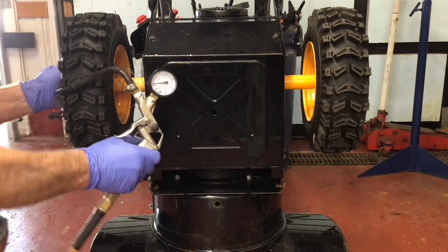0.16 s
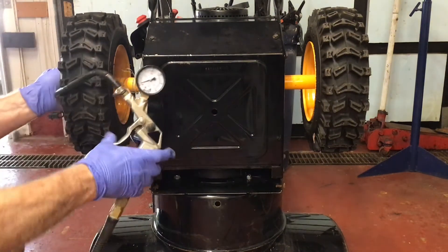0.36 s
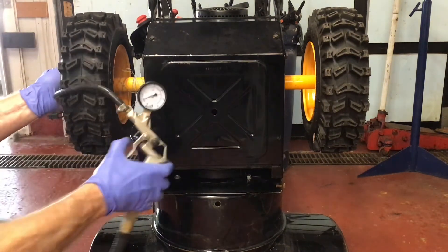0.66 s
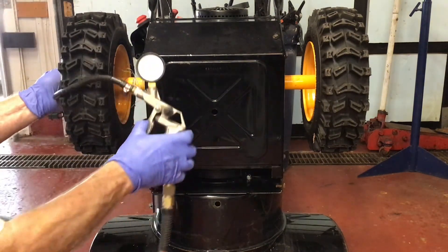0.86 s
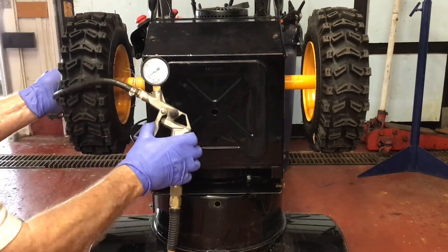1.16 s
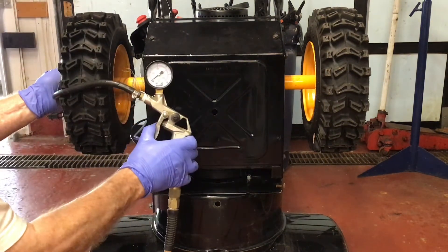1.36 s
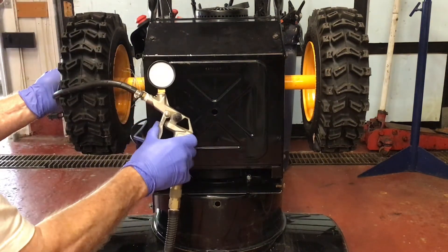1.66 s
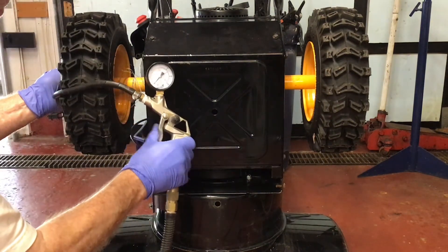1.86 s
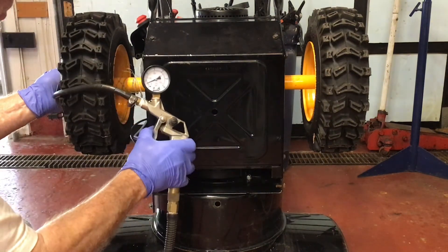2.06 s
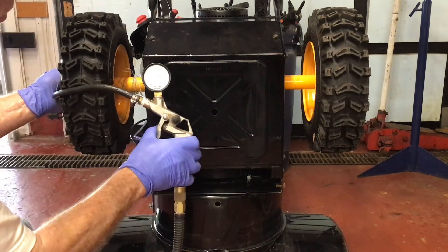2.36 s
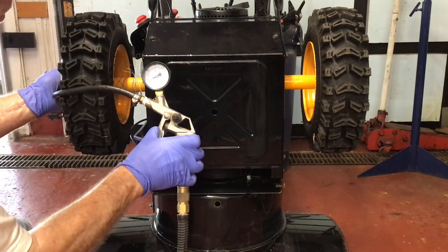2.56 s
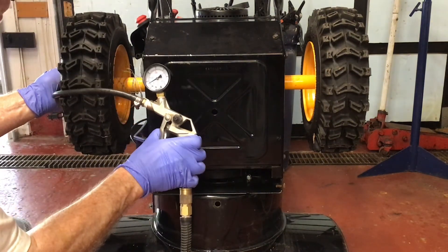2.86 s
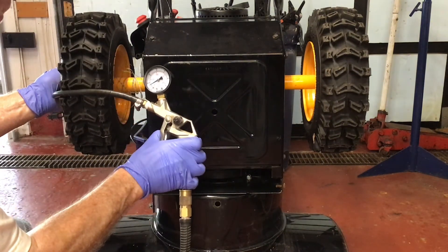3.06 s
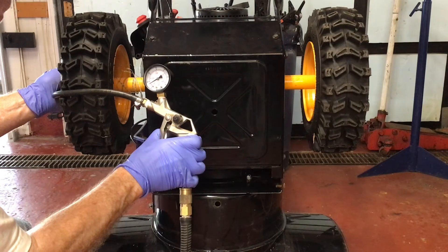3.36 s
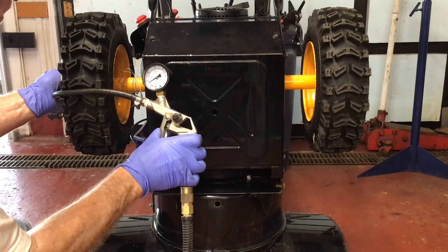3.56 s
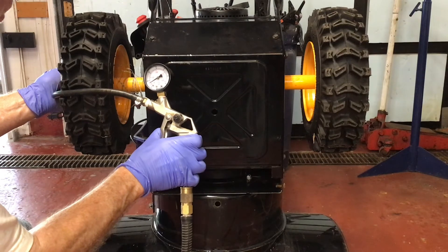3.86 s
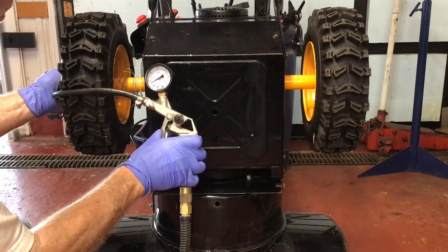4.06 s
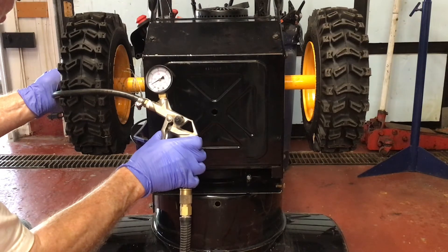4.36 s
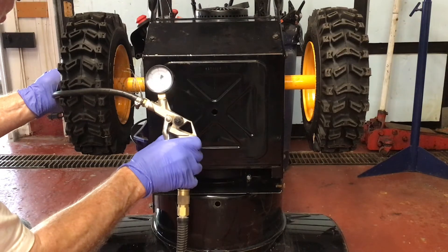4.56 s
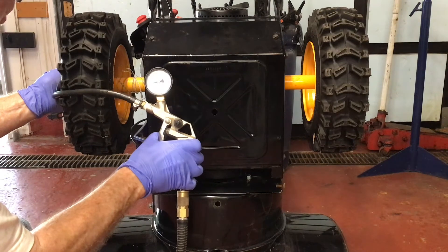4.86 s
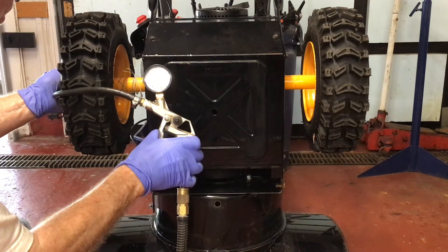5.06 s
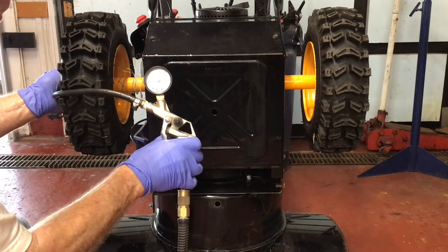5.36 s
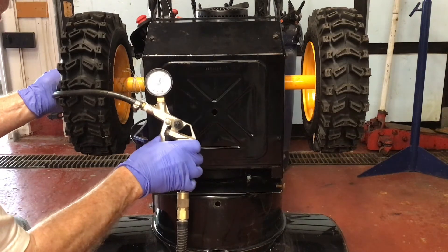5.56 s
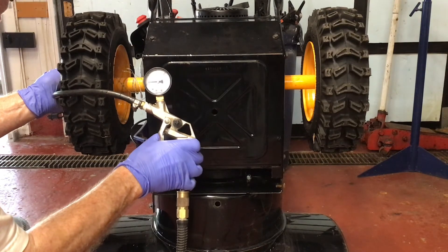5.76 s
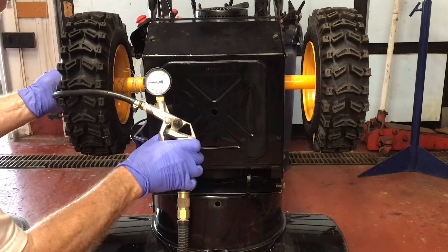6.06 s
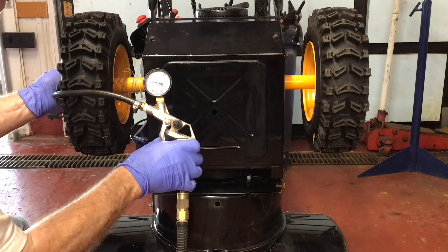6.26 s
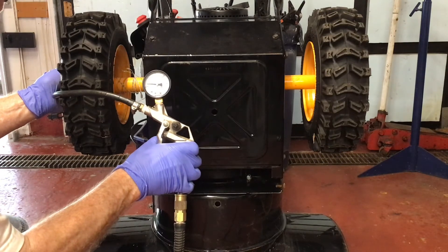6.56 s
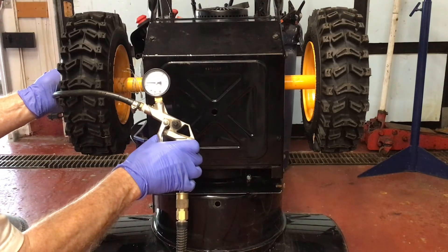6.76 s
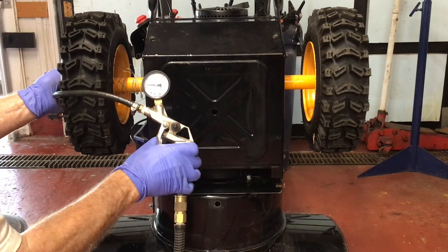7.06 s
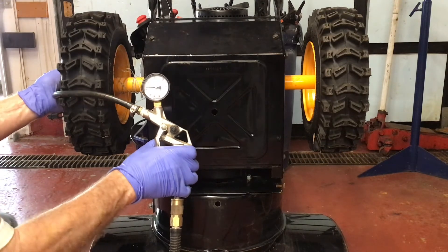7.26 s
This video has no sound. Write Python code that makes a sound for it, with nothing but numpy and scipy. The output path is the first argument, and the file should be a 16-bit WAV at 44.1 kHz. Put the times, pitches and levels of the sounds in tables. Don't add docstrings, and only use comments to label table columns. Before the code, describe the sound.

In an open garage, a hand-held tire inflator is handled with quick metallic clicks, soft hose knocks and faint rubbing. Then come short bursts of compressed air, each started by a trigger click: a soft one, two strong bright hisses, a weaker puff. Cicadas buzz outside over a low traffic rumble. It ends on a glove or hose rub. One microphone, same on both sides, fairly close, with modest room echo.

```python
import sys
import numpy as np
from scipy import signal
from scipy.fft import rfft, irfft
from scipy.io import wavfile
from scipy.ndimage import uniform_filter1d

SR = 44100
rng = np.random.default_rng(int(sys.argv[2]) if len(sys.argv) > 2 else 0)


def store_pcm(level_fs):
    pcm = np.round(np.clip(level_fs, -1, 1) * 32767).astype(np.int16)
    wavfile.write(sys.argv[1], SR, np.atleast_2d(pcm).T)


def ratio_of_db(decibels):
    return 10 ** (np.asarray(decibels, float) / 20)


N = 326340
TIME = np.arange(N) / SR


def rms_one(x):
    return x / np.sqrt(np.mean(x ** 2) + 1e-20)


def curve(rows):
    s, *columns = np.transpose(rows)
    return [np.interp(TIME, s, c) for c in columns]


def at_hz(points, hz):
    point_hz, value = np.transpose(points)
    return np.interp(np.log(hz), np.log(point_hz), value)


def colour(x, points):
    hz = np.maximum(np.fft.rfftfreq(N, 1 / SR), 1)
    return rms_one(irfft(rfft(x) * ratio_of_db(at_hz(points, hz)), N))


def high_pass(x, order, hz):
    return signal.sosfiltfilt(signal.butter(order, hz, "high", fs=SR, output="sos"), x)


def band_pass(x, order, low_hz, high_hz):
    return signal.sosfilt(signal.butter(order, [low_hz, high_hz], "band", fs=SR, output="sos"), x)


def drift(rate_hz, at=np.arange(N)):
    step = max(1, int(SR / rate_hz / 16))
    sos = signal.butter(2, rate_hz, fs=SR / step, output="sos")
    slow = signal.sosfilt(sos, rng.standard_normal(N // step + 202))[200:]
    return np.interp(at / step, np.arange(len(slow)), rms_one(slow))


def ring(clicks, hz, t60):
    r, w = ratio_of_db(-60 / (t60 * SR)), 2 * np.pi * hz / SR
    return signal.lfilter([0, np.sin(w)], [1, -2 * r * np.cos(w), r * r], clicks + 1e-18)


def resonate(x, hz, width):
    r = np.exp(-np.pi * width / SR)
    gain = (1 - r * r) / 2
    return signal.lfilter([gain, 0, -gain], [1, -2 * r * np.cos(2 * np.pi * hz / SR), r * r], x)


# frequency in Hz, t60 in s.
REVERB_TIME = [(100, 0.73), (1000, 0.66), (4000, 0.37), (12000, 0.34)]


def garage(x):
    t, edges_hz = TIME[:SR], [40, 300, 1000, 2500, 6000, 11000, 19000]
    white, tail = rng.standard_normal(SR), 0
    for low, high in zip(edges_hz, edges_hz[1:]):
        t60 = at_hz(REVERB_TIME, np.sqrt(low * high))
        tail = tail + band_pass(white, 2, low, high) * ratio_of_db(-60 * t / t60)
    tail = tail * np.clip(t / 0.019, 0, 1)
    return signal.fftconvolve(x, tail / np.sqrt(np.sum(tail ** 2)))[:N]


ORDERS = np.arange(16, 82)
CYCLE_SIZE = 32768


def partial_levels(cycle_rows, fringe, odd_db):
    uneven = 3.5 * rng.standard_normal(len(ORDERS)) * (ORDERS > 52)
    order_db = np.interp(ORDERS, *np.transpose(fringe)) + odd_db * (ORDERS % 2) + uneven
    order_db[[int(k) - ORDERS[0] for k, db in cycle_rows]] = [db for k, db in cycle_rows]
    return order_db


def tymbal_phase(pitch):
    rate_hz = curve(pitch)[0]
    sagging = np.clip(-np.gradient(rate_hz) * SR / 10, 0, 1)
    unsteady = (.0011 + .002 * sagging) * drift(20.0) + .0012 * drift(5.0)
    return np.cumsum(rate_hz) / SR + unsteady


def shimmer():
    at = np.arange(0, N, 64)
    swell_db, flicker_db = 1.5 * drift(2.5, at), 2.4 * drift(22.0, at)
    return np.interp(np.arange(N), at, ratio_of_db(swell_db + flicker_db))


def tymbals(order_db, at):
    partials = np.zeros((7, CYCLE_SIZE // 2 + 1), complex)
    partials[ORDERS % 7, ORDERS] = ratio_of_db(order_db) * np.exp(2j * np.pi * rng.random(len(ORDERS)))
    cycles = irfft(partials) / np.std(irfft(partials.sum(axis=0)))
    return sum(shimmer() * cycle[at] for cycle in cycles)


def abdomen_flutter(order_db, phase, at):
    sides = np.zeros((2, CYCLE_SIZE // 2 + 1), complex)
    chance = rng.standard_normal((2, len(ORDERS), 2)) @ [1, 1j]
    sides[:, ORDERS] = ratio_of_db(uniform_filter1d(order_db, size=3)) * chance
    sides = irfft(sides) / np.std(irfft(sides))
    turn = 2 * np.pi * .289 * phase
    return sides[0][at] * np.cos(turn) + sides[1][at] * np.sin(turn)


def cicada(pitch, level, cycle_rows, fringe, odd_db, path, wet_db, flutter_db):
    order_db = partial_levels(cycle_rows, fringe, odd_db)
    phase = tymbal_phase(pitch)
    at = (phase % 1 * CYCLE_SIZE).astype(int) % CYCLE_SIZE
    buzz = tymbals(order_db, at) + ratio_of_db(flutter_db) * abdomen_flutter(order_db, phase, at)
    buzz = buzz * ratio_of_db(curve(level)[0])
    buzz = (buzz + ratio_of_db(wet_db) * garage(buzz)) / np.sqrt(1 + ratio_of_db(2 * wet_db))
    hz = np.arange(3000., 13500.)
    lift_db = sum(db / (1 + (2 * (hz - top_hz) / width) ** 2) for top_hz, width, db in path)
    return irfft(rfft(buzz) * ratio_of_db(np.interp(np.fft.rfftfreq(N, 1 / SR), hz, lift_db)), N)


# time in seconds, cycles in Hz.
FIRST_RATE = [(0, 194.28), (.3, 194.4), (1.5, 194.43), (1.8, 194.29), (2.1, 193.79), (2.5, 192.95),
              (2.8, 191.4), (3.1, 189.2), (3.4, 185.1), (3.6, 181.06), (3.7, 181.87), (3.8, 184.78),
              (3.9, 184.13), (4.2, 178.3), (4.5, 171.16)]
# time in seconds, level in dB.
FIRST_LOUDNESS = [(0, -47.5), (1.2, -46.5), (1.8, -44.5), (2.1, -48.5), (2.4, -47.5), (2.7, -49.5),
                  (2.9, -47.5), (3.4, -53.5), (3.65, -53), (3.85, -55), (4.049, -57.5), (4.5, -59),
                  (4.7, -95)]
# multiple of the tymbal rate, level in dB.
FIRST_PARTIALS = [(23, -30.0), (24, -23.0), (25, -23.5), (26, -26.0), (27, -22.5), (28, -9.5), (29, -15.5),
                  (30, -8.0), (31, -16.5), (32, -16.5), (33, -7.0), (34, -17.5), (35, -2.5), (36, -10.5),
                  (37, 0.0), (38, -13.5), (39, -4.5), (40, -7.5), (41, -14.5), (42, -6.0), (43, -8.0),
                  (44, -12.0), (45, -9.0), (46, -10.5), (47, -21.5), (48, -17.0), (49, -19.0), (50, -22.5),
                  (51, -23.5), (52, -23.0)]
# multiple of the tymbal rate, level in dB.
FIRST_OUTER = [(16, -37), (18, -54), (20, -45), (22, -33.5), (53, -16.5), (65, -26.5), (70, -30.5),
               (81, -40)]
# frequency in Hz, width in Hz, lift in dB.
FIRST_ECHOES = [(4423.0, 50, 3.4), (4612.0, 50, 4.0), (4810.0, 50, 3.3), (5005.0, 50, 4.4),
                (5218.0, 25, 7.8), (5416.0, 25, 4.0), (5533.0, 50, 8.2), (5617.0, 12, 5.3),
                (5803.0, 25, -3.5), (5833.0, 12, 2.5), (5977.0, 50, 11.3), (6010.0, 12, 4.4),
                (6025.0, 6, -2.9), (6403.0, 12, 12.5), (6469.0, 6, 6.4), (6571.0, 25, 5.4),
                (6766.0, 12, -5.0), (6805.0, 6, 4.3), (6871.0, 50, -5.2), (6976.0, 25, 5.4),
                (7045.0, 25, -4.5), (7111.0, 6, 4.4), (7189.0, 6, 2.7), (7321.0, 50, 10.5),
                (7531.0, 50, 10.6), (7567.0, 12, -3.8), (7744.0, 50, 6.0), (7771.0, 6, -4.7),
                (7819.0, 25, 7.1), (7852.0, 50, 4.1), (7933.0, 6, 6.7), (7945.0, 6, -5.4),
                (7948.0, 25, 12.4), (7951.0, 6, 5.2), (7972.0, 6, -3.1), (8116.0, 25, -5.6),
                (8167.0, 12, 6.3), (8284.0, 50, 4.1), (8404.0, 50, 6.0), (8494.0, 12, 5.6),
                (8698.0, 50, 9.3), (8722.0, 12, 3.6), (8746.0, 6, -2.9), (8956.0, 50, 7.6),
                (9007.0, 12, 6.3), (9094.0, 50, 10.0), (9115.0, 6, 6.3), (9139.0, 6, -3.0),
                (9628.0, 50, 4.3), (10075.0, 25, 5.1)]


def first_cicada():
    return ratio_of_db(-2.5) * cicada(FIRST_RATE, FIRST_LOUDNESS, FIRST_PARTIALS, FIRST_OUTER, odd_db=-13.0,
                              path=FIRST_ECHOES, wet_db=-11.0, flutter_db=-11.0)


# time in seconds, cycles in Hz.
SECOND_RATE = [(0, 191.64), (.3, 193.2), (.9, 195.33), (1.5, 196.04), (2.1, 196.42), (2.7, 196.52),
               (3.6, 197.29), (4.5, 197.9), (5.1, 198.2), (5.6, 198.46), (5.84, 198.08), (5.96, 197.67),
               (6.2, 195.76), (6.32, 193.61), (6.68, 185.94), (6.92, 183.07), (7.4, 174.52)]
# time in seconds, level in dB.
SECOND_LOUDNESS = [(0, -88), (.5, -69), (1.2, -55), (1.6, -57), (2.1, -47.5), (2.85, -42.5), (3.08, -45),
                   (3.3, -43.5), (3.9, -43), (4.2, -44.5), (4.5, -44.5), (5.701, -45), (5.95, -46.5),
                   (6.2, -45), (6.5, -50), (6.901, -52.5), (7.4, -57)]
# multiple of the tymbal rate, level in dB.
SECOND_PARTIALS = [(23, -19.0), (24, -19.0), (25, -19.0), (26, -12.5), (27, -18.0), (28, -6.0), (29, -16.0),
                   (30, -5.5), (31, -14.0), (32, -4.5), (33, -15.5), (34, -7.0), (35, -9.0), (36, -2.5),
                   (37, -13.0), (38, -1.5), (39, -9.0), (40, -1.5), (41, -8.0), (42, -5.5), (43, -5.5),
                   (44, -6.5), (45, -3.0), (46, -8.0), (47, 0.0), (48, -10.0), (49, -5.5), (50, -13.0),
                   (51, -11.0), (52, -24.0)]
# multiple of the tymbal rate, level in dB.
SECOND_OUTER = [(16, -36.5), (22, -37), (53, -13), (64, -19.5), (68, -25.5), (81, -35)]
# frequency in Hz, width in Hz, lift in dB.
SECOND_ECHOES = [(3545, 16, 14), (3568, 8, 9), (3958, 14, 8), (4130, 20, 12), (4666.0, 50, 5.7),
                 (5125.0, 12, 6.0), (5500.0, 12, -3.9), (5548.0, 25, 10.5), (5752.0, 12, 5.4),
                 (5893.0, 6, -5.1), (5914.0, 25, 7.6), (5929.0, 6, 3.4), (6163.0, 50, 5.0),
                 (6316.0, 12, 6.1), (6457.0, 50, 5.1), (6547.0, 6, 5.1), (6691.0, 50, 3.7),
                 (6916.0, 12, 4.0), (7129.0, 25, 8.3), (7240.0, 50, 7.9), (7330.0, 25, 2.7),
                 (7528.0, 25, 5.7), (7717.0, 25, 7.8), (7855.0, 6, 3.6), (7886.0, 12, -7.0),
                 (7912.0, 16, 15.0), (8068.0, 25, 7.8), (8095.0, 6, -5.9), (8128.0, 12, 6.8),
                 (8248.0, 6, 3.7), (8269.0, 6, -5.8), (8278.0, 50, 7.7), (8290.0, 6, 3.8),
                 (8329.0, 25, -4.5), (8464.0, 12, -4.6), (8500.0, 6, 4.0), (8515.0, 12, 4.8),
                 (8653.0, 12, -4.6), (8689.0, 25, 9.0), (8713.0, 6, 4.7), (8893.0, 6, -5.4),
                 (8905.0, 6, 3.5), (8935.0, 50, 8.3), (9058.0, 12, 10.5), (9250.0, 25, -3.5),
                 (9280.0, 12, 3.0), (9289.0, 50, 6.1), (9302.0, 10, -7.0), (9315.0, 10, 6.0),
                 (9487.0, 25, 5.6), (9625.0, 12, 3.3), (9709.0, 12, 8.7), (9859.0, 50, 5.3),
                 (10033.0, 12, 4.7), (10081.0, 12, 8.4), (12610, 13, 12)]


def second_cicada():
    return ratio_of_db(-6.0) * cicada(SECOND_RATE, SECOND_LOUDNESS, SECOND_PARTIALS, SECOND_OUTER, odd_db=0.5,
                              path=SECOND_ECHOES, wet_db=-7.5, flutter_db=-19.0)


# time in seconds, level in dB, extra treble in dB.
CHORUS_SWELL = [(0, -55, 3), (1.6, -56, 4), (2.8, -55.5, 1), (3.5, -53.5, -7), (5.3, -55.5, -8),
                (5.9, -52.5, -2), (6.4, -53.5, -1), (7.4, -54, -1)]
# frequency in Hz, density in dB per Hz.
CHORUS_SPECTRUM = [(2500, -58), (3900, -37), (4650, -19.5), (5100, -11), (5500, -7.5), (6500, -3),
                   (7500, -2), (8500, -7.5), (9500, -4.5), (10500, -14.5), (11500, -20), (12500, -21),
                   (13500, -27), (15800, -27)]


def far_chorus():
    level_db, treble_db = curve(CHORUS_SWELL)
    far = colour(rng.standard_normal(N), CHORUS_SPECTRUM)
    treble, top = high_pass(far, 4, 10500), high_pass(far, 4, 13100)
    far = far + (ratio_of_db(treble_db) - 1) * treble
    far = far + (ratio_of_db(np.minimum(treble_db, 0)) - 1) * ratio_of_db(treble_db) * top
    return far * ratio_of_db(level_db + .6 * drift(5.0))


# frequency in Hz, density in dB per Hz.
RUMBLE_SPECTRUM = [(18, -37), (30, -49), (45, -11), (133, 2), (185, -6.5), (223, -9.5), (286, -7.5),
                   (317, -10.5), (479, -16), (627, -18.5), (1120, -23), (1590, -30), (3280, -35.5),
                   (3490, -35.5), (4200, -29.5), (5460, -57), (9240, -120)]


def rumble():
    return colour(rng.standard_normal(N), RUMBLE_SPECTRUM) * ratio_of_db(-58 + .8 * drift(3.0))


# peak in seconds, rise and fall over 20 dB in seconds, level in dB.
RUB_STROKES = [
    (.06, 0.3, 0.046, -64),
    (.112, 0.0065, 0.087, -56),
    (.2, 0.085, 0.3, -67.5),
    (.548, 0.32, 0.089, -61),
    (.628, 0.11, 0.45, -63),
    (2.708, .1, 0.13, -62.5),
    (3.7, 0.034, 0.15, -63.5),
    (7.4, 0.11, 0.099, -47),
]
# frequency in Hz, density in dB per Hz.
RUB_SPECTRUM = [(150, -4), (400, 7), (900, 2), (2200, -2.5), (4000, -4.5), (8000, -37)]


def rubbing():
    t = TIME[::16]
    strokes = sum(ratio_of_db(db - 20 * np.maximum((s - t) / rise, (t - s) / fall)) for s, rise, fall, db in RUB_STROKES)
    grains = colour(rng.standard_normal(N) * ratio_of_db(3.4 * drift(460.0)), RUB_SPECTRUM)
    return grains * np.interp(TIME, t, strokes) * ratio_of_db(-2.0)


# start in seconds, crack in dB, snap above 8 kHz in dB, ring
# under the crack in dB.
METAL_TICKS = [(0.1115, -66, -66, -12), (0.124, -61, -65, -12), (0.2104, -53, -60, -21),
               (0.212, -37, -38, -16.5), (0.382, -45, -67, -19), (0.391, -37, -60, -22),
               (0.4501, -31.5, -31.5, -21), (0.4524, -37, -46, -19.5), (0.456, -50, -55, -26),
               (0.608, -55, -68, -14), (0.67, -70, -60, -14), (0.709, -57, -52, -13),
               (0.717, -72, -58, -14), (0.9127, -63, -62, -14), (1.224, -58, -66, -12),
               (1.722, -35.5, -45, -8), (4.378, -57, -63, -19), (4.5665, -34.5, -50, -11),
               (5.3968, -35.5, -44, -12)]
# frequency in Hz, level in dB, t60 in s.
GUN_BODY = [(860, -7, 0.03), (1690, -25, 0.037), (2320, -6, 0.048), (2700, 4, 0.02), (3340, -2, 0.092),
            (4520, 2.5, 0.029), (5130, 3, 0.052), (5300, 1, 0.044), (6500, -16, .025), (2246, -10, 0.096),
            (2365, -17, 0.2), (3500, -13, 0.12), (4360, -23, 0.12)]
# frequency in Hz, width in Hz, level in dB.
LOOSE_PARTS = [(2440, 310, 7.5), (3500, 250, 6), (4600, 600, 7)]


def ticks():
    size, spike = 9000, 3.5
    out, click, age = np.zeros(N), np.eye(1, size)[0], TIME[:size]
    modes = np.array([ratio_of_db(mode_db) * ring(click, hz, t60) for hz, mode_db, t60 in GUN_BODY])
    bright = signal.butter(2, 8000, "high", fs=SR, output="sos")
    for s, db, snap_db, ring_db in METAL_TICKS:
        dull, sharp = rng.standard_normal((2, size))
        body = ratio_of_db(rng.normal(0, 1.6, len(GUN_BODY))) @ modes
        crack = band_pass(spike * click + dull * ratio_of_db(-60 * age / .018), 3, 2050, 7000)
        rattle = sum(resonate(dull * ratio_of_db(part_db - 60 * age / 0.31), hz, width)
                     for hz, width, part_db in LOOSE_PARTS)
        snap = signal.sosfilt(bright, spike * click + sharp) * ratio_of_db(-60 * age / 0.024)
        tick = ratio_of_db(db + ring_db) * (body + rattle) + ratio_of_db(db - 3.0) * crack + ratio_of_db(snap_db) * snap
        out[round(s * SR):][:size] += tick
    return out


# start in seconds, peak in dB, pitch in Hz, t60 in s.
HOSE_KNOCKS = [(.113, -36.5, 764, 0.033), (0.113, -46, 1400, 0.06), (.61, -53, 1750, .12),
               (.116, -33.5, 261, 0.1), (0.121, -37, 103, 0.18), (0.126, -44, 149, 0.1),
               (.130, -41.5, 324, 0.17), (0.15, -37.5, 277, 0.087), (.14, -49, 114, 0.096),
               (0.262, -55, 2390, 0.098), (.609, -39, 425, 0.088), (.612, -51, 930, 0.13),
               (.628, -44, 610, 0.076), (.647, -44.5, 406, 0.13), (.652, -50, 510, 0.12),
               (.672, -46, 325, 0.14), (0.914, -57, 1320, 0.033), (1.331, -51.5, 325, 0.22),
               (1.463, -68, 500, 0.049), (2.7, -58, 1490, 0.078), (3.7, -52, 765, 0.16),
               (3.722, -54, 2290, 0.075), (5.688, -49, 750, 0.083)]


def knocks():
    size, out = SR // 3, np.zeros(N)
    push = np.r_[np.hanning(24) / 12, np.zeros(size - 24)]
    for s, db, hz, t60 in HOSE_KNOCKS:
        noise = rng.standard_normal(size) * ratio_of_db(-60 * TIME[:size] / (1.7 * t60))
        broad = band_pass(noise, 2, 0.41 * hz, 1.7 * hz)
        knock = .9 * ring(push, hz, .7 * t60) + .4 * broad / np.max(abs(broad))
        out[round(s * SR):][:size] += ratio_of_db(db) * knock
    return out


# start in seconds, length in seconds, start and end pitch in Hz, level in dB.
VALVE_WHISTLES = [
    (6.34, 0.17, 4100, 4075, -57),
    (6.325, .055, 6300, 5650, -46),
    (5.56, 0.14, 725, 700, -61),
    (1.9, 0.03, 1640, 1700, -56),
    (6.34, .09, 3350, 3350, -59),
    (1.7205, .007, 5250, 5150, -30),
    (1.72, .016, 14500, 14300, -44),
    (4.5655, .009, 4950, 4850, -35),
    (4.575, .1, 5195, 5195, -47),
]


def whistles():
    out = np.zeros(N)
    for s, length, start_hz, end_hz, db in VALVE_WHISTLES:
        glide = np.linspace(start_hz, end_hz, round(length * SR))
        tone = np.sin(2 * np.pi * np.cumsum(glide) / SR)
        out[round(s * SR):][:len(glide)] += ratio_of_db(db) * np.hanning(len(glide)) * tone
    return out


# valve opens in seconds, held in seconds, hose rush in dB, jet hiss in dB,
# jet dies in dB per s.
TRIGGER_PULLS = [
    (1.724, 0.18, -46.5, -50, 270),
    (4.568, .22, -45.5, -37, 131),
    (5.402, 0.18, -45, -35, 125),
    (6.338, .08, -53, -45.5, 186),
    (7.349, 0.044, -57, -79, 118),
]


def bursts():
    squeeze, pop = .075, 0.0097
    knee_db, fast, slow = 20, 79, 55
    knee = knee_db / fast
    rush, jet, modes = np.zeros((3, N))
    for s, held, rush_db, jet_db, jet_dies in TRIGGER_PULLS:
        near = slice(round((s - .2) * SR), round((s + held + .6) * SR))
        age = TIME[near] - s
        shut = np.maximum(TIME[near] - s - held, 0)
        alive = (age > -squeeze - .03) & (shut < .5)
        fade = alive * np.clip(np.minimum(age + squeeze + .03, .5 - shut) / .03, 0, 1)
        opening = np.interp(age, [-squeeze, -.01, 0, min(pop, .9 * held), held], [-33, -6, -0.5, -2, 0])
        dying = fast * np.minimum(shut, knee) + slow * np.maximum(shut - knee, 0)
        rush[near] += fade * ratio_of_db(rush_db + opening - dying)
        rising = np.interp(age, [-squeeze, -.01, min(0.081, held)], [-73, -47.5, jet_db])
        jet[near] += fade * ratio_of_db(np.minimum(rising, jet_db + age.clip(-1, 0) * 60) - jet_dies * shut)
        shut_db, squeeze_db = -8.5 * np.clip(shut / 0.13, 0, 1), -3.5 * (age < 0)
        modes[near] += alive * ratio_of_db(6 - 0.36 * s + shut_db + squeeze_db)
    leak_s = 5.75
    leak = ratio_of_db(-62 - 45 * np.maximum(TIME - leak_s, 10 * (leak_s - TIME)))
    return rush, jet + leak, modes


# frequency in Hz, width in Hz, level in dB.
HOSE_MODES = [(712, 39, -21), (1116, 52, -17.5), (1540, 17, -15), (1666, 20, -10.5), (2197, 17, -12),
              (2790, 31, -8), (3017, 11, -11.5), (3384, 21, -3.5), (3807, 20.5, -3.5), (4144, 21, -3.5),
              (4286, 65, -5), (4780, 22, 2), (4970, 100, -13.5), (5227, 28, 2.5), (5470, 22, -8.5),
              (5670, 28, -5.5), (5920, 34, -7.5)]
# frequency in Hz, width in Hz, level in dB.
NOZZLE_MODES = [(6360, 130, -7.5), (9000, 420, -15), (10200, 450, -10.5), (12140, 230, -16.5),
                (13900, 270, -18), (15200, 250, -21)]
# frequency in Hz, density in dB per Hz.
RUSH_SPECTRUM = [(400, -14.5), (700, -13.5), (1500, -14.5), (3000, -7.5), (5000, -29), (6500, -7.5),
                 (9000, -7), (15800, -18.5)]


def hose_rush(rush_gain, jet_gain, mode_gain):
    flowing = np.flatnonzero(rush_gain > 0)
    white, modes, rush = rng.standard_normal(len(flowing)), 0, np.zeros(N)
    blur = np.interp(20 * np.log10(jet_gain[flowing] + 1e-9), [-44, -35], [0, 1])
    widens = 4
    for k, (hz, width, db) in enumerate(list(HOSE_MODES) + list(NOZZLE_MODES)):
        clear = resonate(white, hz, width)
        blurred = resonate(white, .985 * hz, widens * width) / np.sqrt(widens)
        mode = (1 - blur) * clear + blur * blurred
        modes = modes + (-1) ** k * ratio_of_db(db + 1.5 * drift(7.0, at=flowing)) * mode
    rush[flowing] = rms_one(modes)
    rush = rush * mode_gain + ratio_of_db(-3.0) * colour(rng.standard_normal(N), RUSH_SPECTRUM)
    return rush * rush_gain * ratio_of_db(1.0 + 0.24 * drift(15.0))


# frequency in Hz, density in dB per Hz.
JET_SPECTRUM = [(1500, -27), (3000, -7), (5000, -0.5), (7000, -4), (10000, 2), (13000, 4.5), (15200, 9.5),
                (16000, 0.5)]


def nozzle_jet(jet_gain):
    jet = colour(rng.standard_normal(N) * ratio_of_db(4.8 * drift(14000.0)), JET_SPECTRUM)
    top_gain = ratio_of_db(-8 + 1 * TIME + 1.7 * drift(600.0)) * (100 * jet_gain + 1e-9) ** -0.052
    jet = jet + high_pass(jet, 2, 11500) * (top_gain - 1)
    return jet * jet_gain * ratio_of_db(2.5 + 0.55 * drift(25.0))


def air():
    rush_gain, jet_gain, mode_gain = bursts()
    return hose_rush(rush_gain, jet_gain, mode_gain) + nozzle_jet(jet_gain) + whistles()


def scene():
    outside = first_cicada() + second_cicada() + far_chorus()
    hits, hiss = rubbing() + ticks() + knocks(), air()
    room = garage(ratio_of_db(-10.0) * hits + ratio_of_db(-19.5) * hiss)
    mono = outside + rumble() + hits + hiss + room
    return np.array([mono, mono])


def roll_off(x):
    return signal.sosfilt(signal.butter(12, 16650, fs=SR, output="sos"), x)


def record(dry):
    no_bass = signal.sosfilt(signal.butter(8, 47, "high", fs=SR, output="sos"), dry)
    no_top = signal.sosfilt(signal.ellip(12, .5, 70, 15720, fs=SR, output="sos"), no_bass)
    return roll_off(no_top)


dry = scene()
out = record(dry)
store_pcm(out)
```